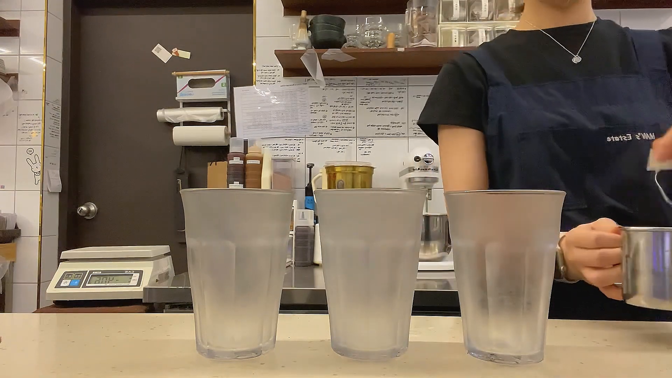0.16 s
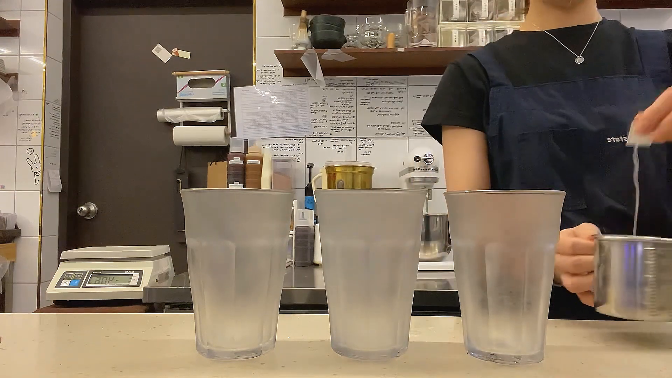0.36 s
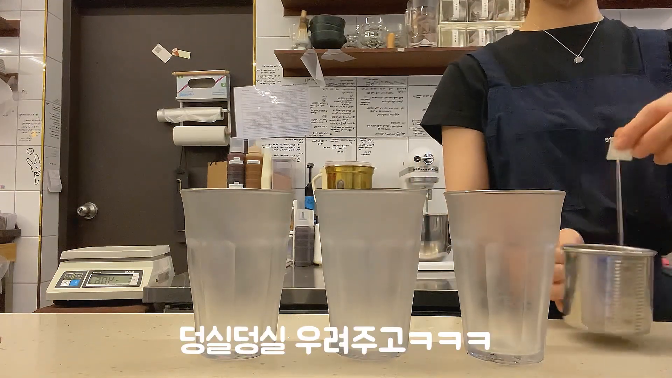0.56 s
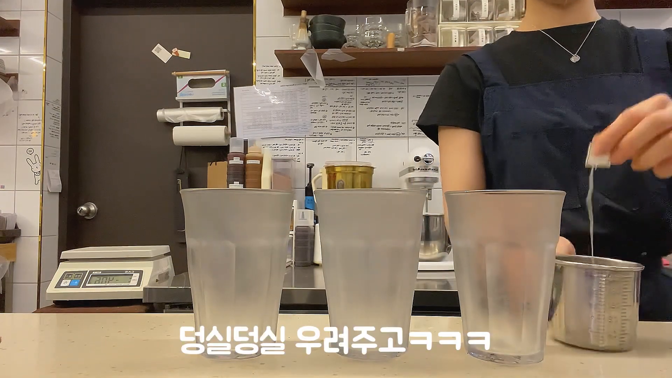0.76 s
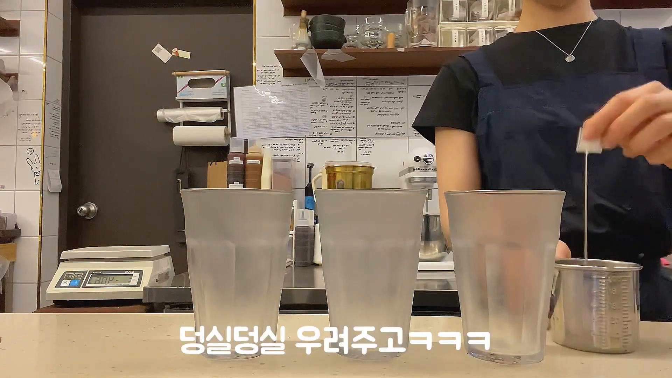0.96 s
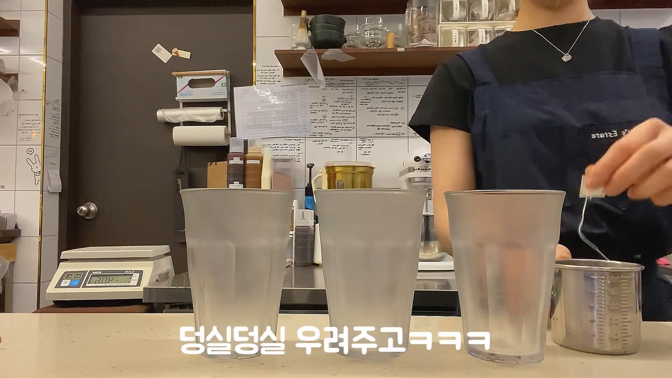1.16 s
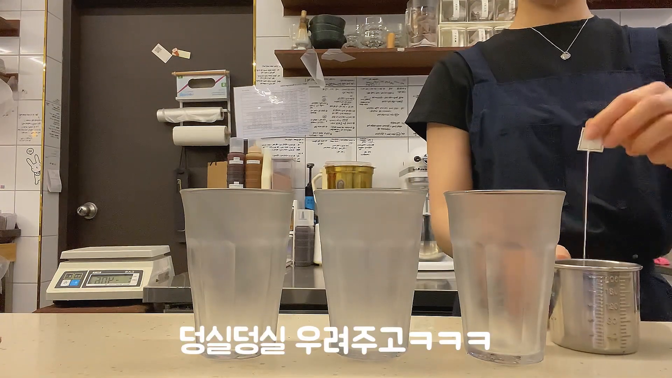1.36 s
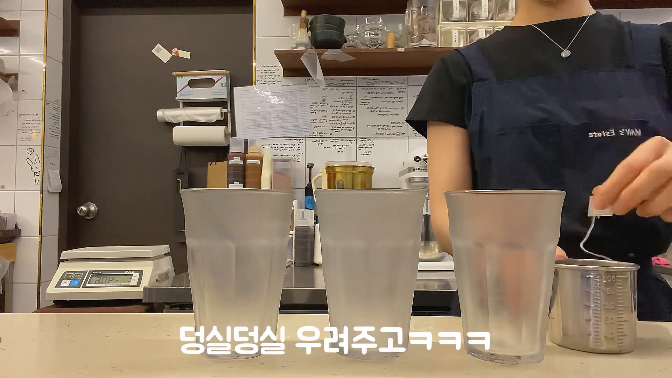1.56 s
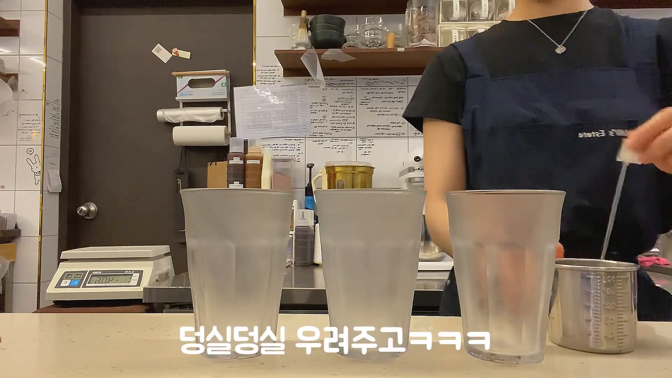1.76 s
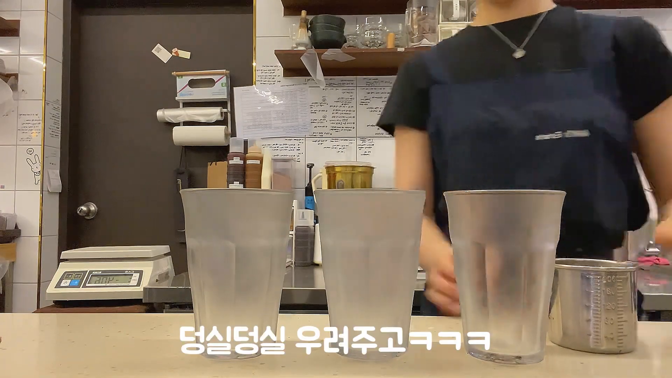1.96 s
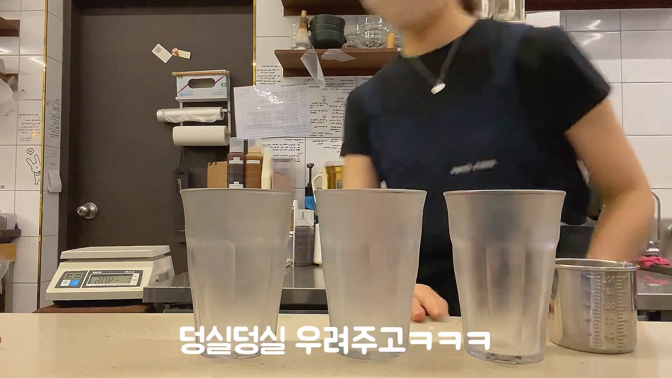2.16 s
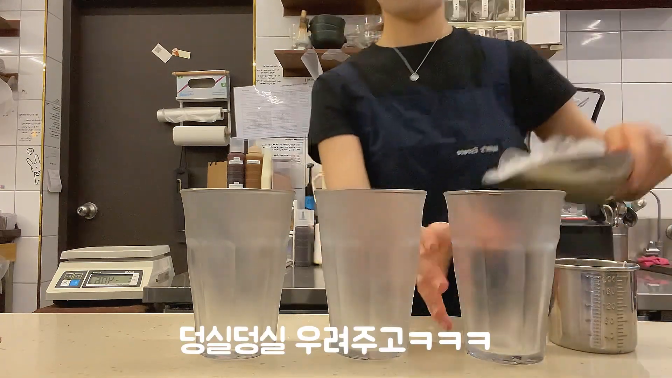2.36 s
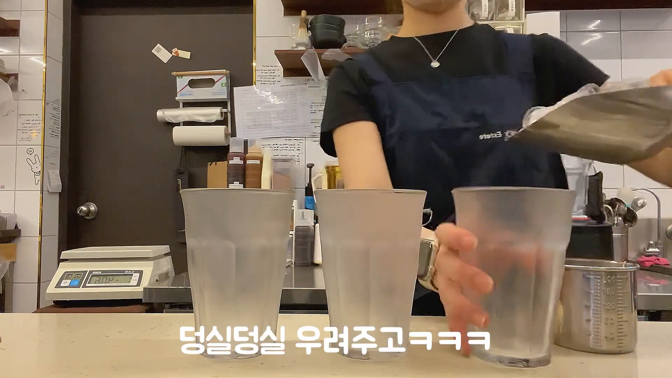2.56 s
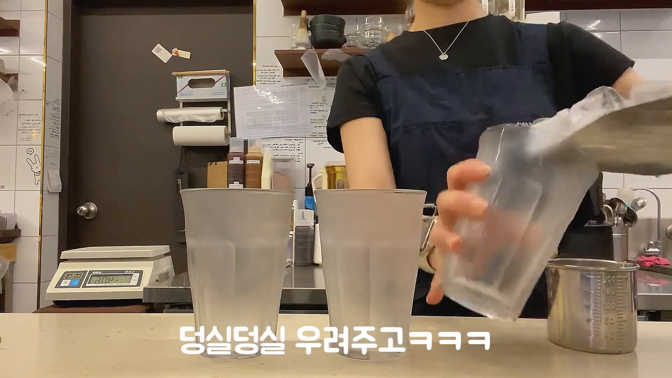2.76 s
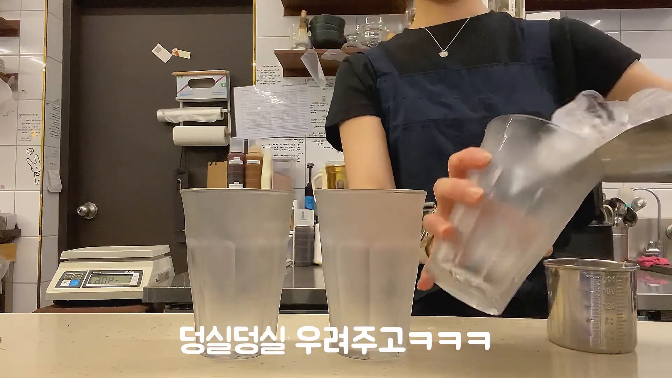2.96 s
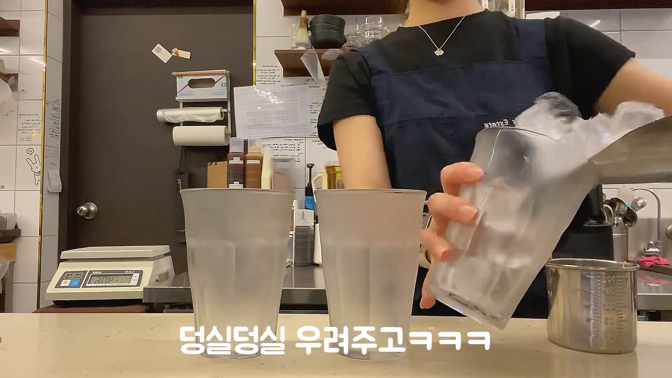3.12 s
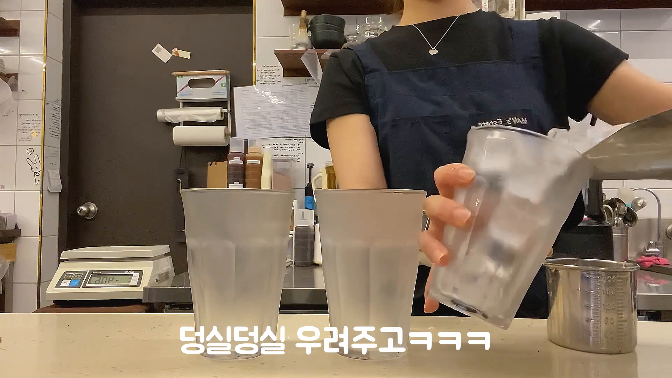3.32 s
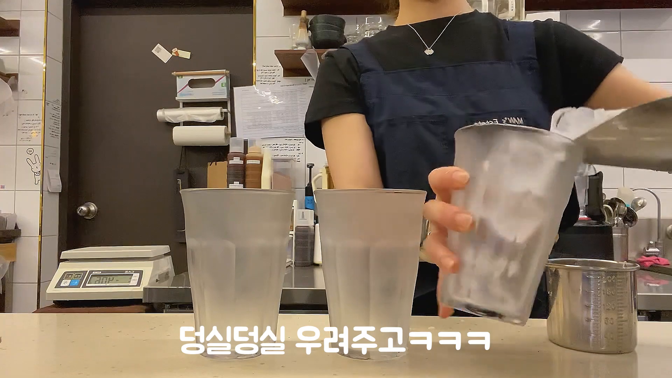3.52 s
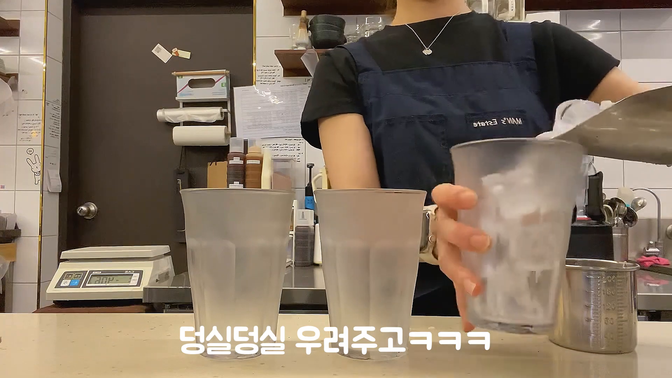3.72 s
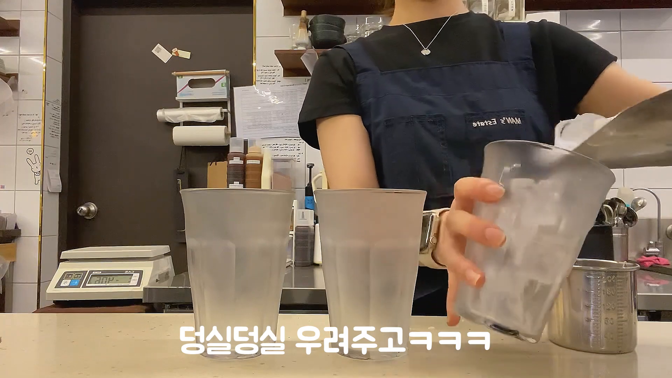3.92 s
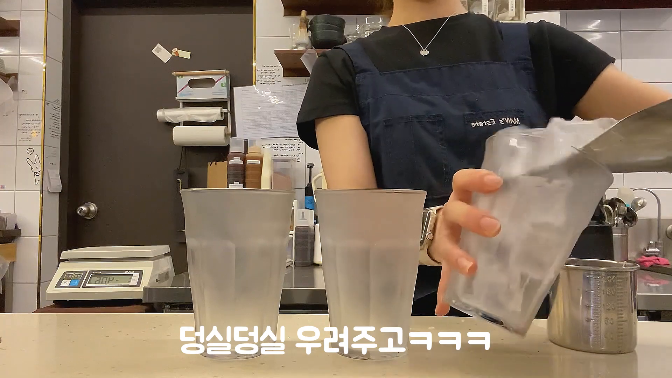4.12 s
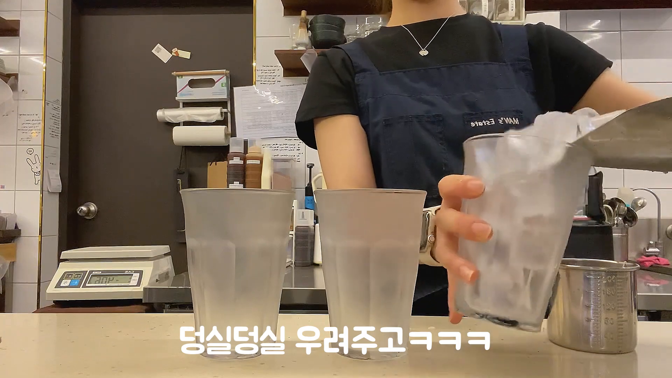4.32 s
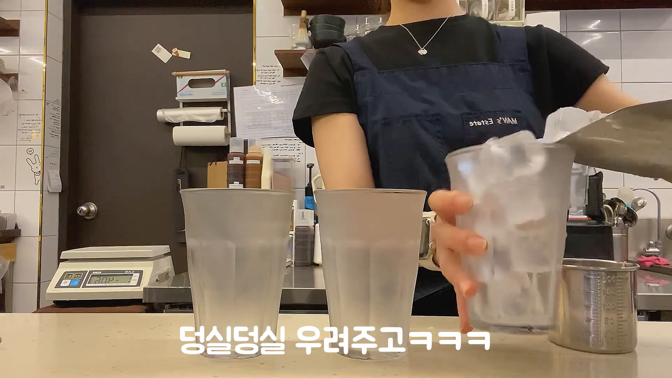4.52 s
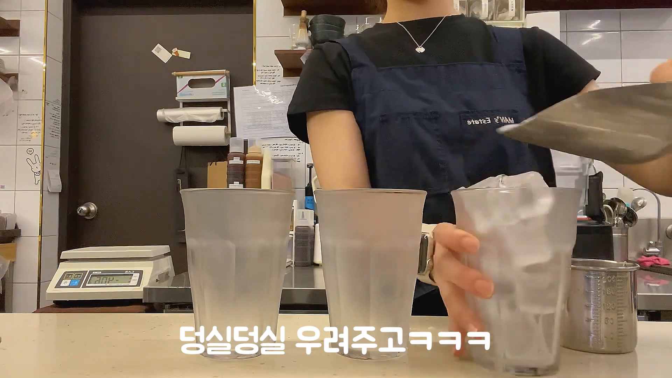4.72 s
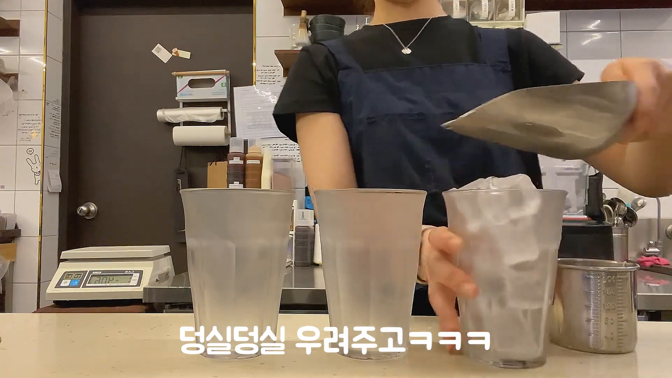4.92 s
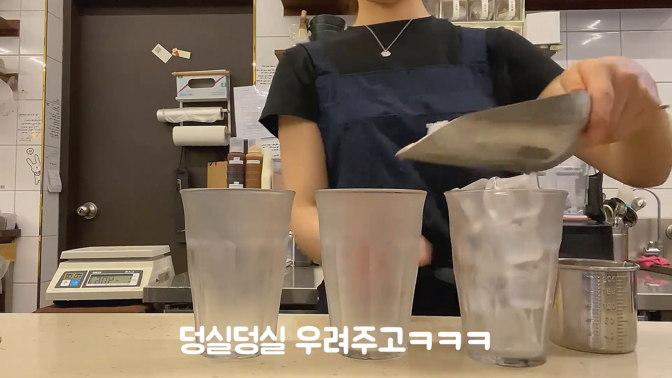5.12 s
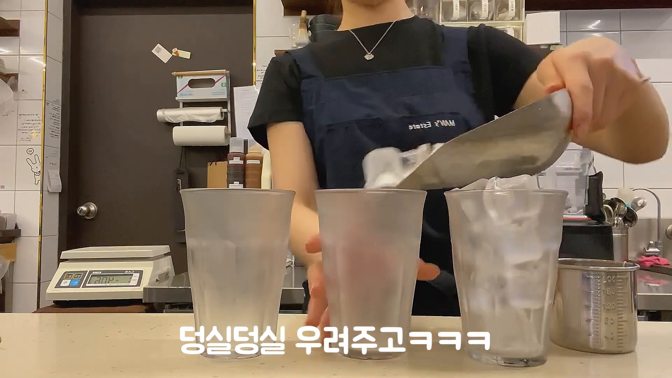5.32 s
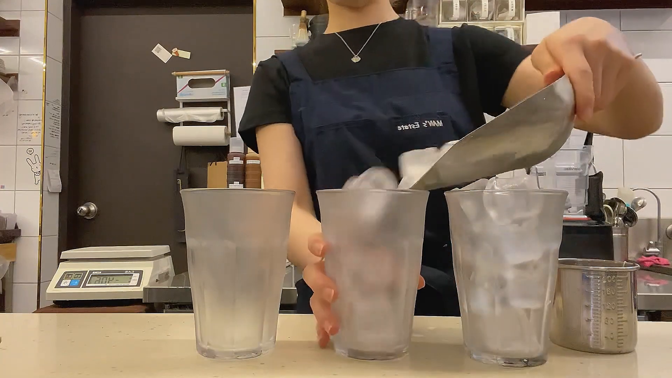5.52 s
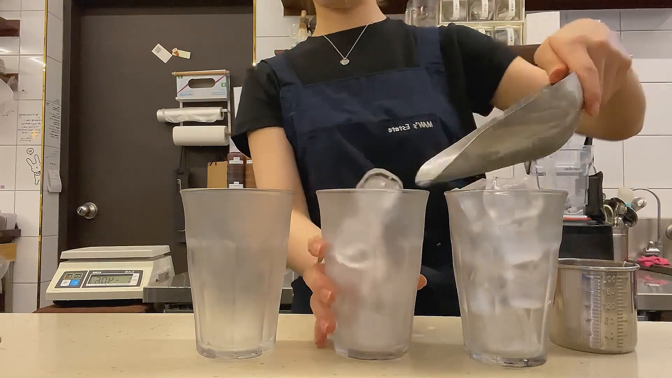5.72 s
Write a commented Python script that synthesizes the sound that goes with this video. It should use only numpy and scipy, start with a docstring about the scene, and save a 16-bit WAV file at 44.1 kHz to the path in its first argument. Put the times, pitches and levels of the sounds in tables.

```python
"""Ice cubes in drinking glasses

Ice is handled, scooped and tipped into thick glasses on the counter of a small cafe kitchen. Impacts
excite the modes of the glass wall (clinks), of the air inside it (a hollow note) and of the counter
(thumps); irregular solids knock and rustle in bands of decaying noise. A machine rumbles behind,
and the close microphone saturates softly on the loudest clinks."""
import sys
import numpy as np
from scipy import signal
from scipy.fft import rfft, irfft
from scipy.io import wavfile
from scipy.ndimage import uniform_filter1d

SR = 44100
rng = np.random.default_rng(int(sys.argv[2]) if len(sys.argv) > 2 else 0)


def put_to_file(sound):
    """Save the sound as 16-bit audio at rate SR, in the file named by the first command-line argument."""
    columns = np.atleast_2d(sound).T  # one column per channel
    safe = np.clip(columns, -1, 1)
    whole_steps = np.round(safe * 32767)
    wavfile.write(sys.argv[1], SR, whole_steps.astype(np.int16))


N = 254898

# Wall modes in close pairs: f/Hz, partner offset/Hz, share of the decay time, roughness from rubbing/dB
WALL_MODES = [(2643, 24, 1, 1.8), (6842, -45, .8, 4), (10150, 40, .6, 3), (11585, 45, .5, 3)]
# Cubes striking the wall: t/s, level/dB of each of the four modes, decay time T60/s
WALL_STRIKES = [(2.927, 1, -12, -43, -43, 0.22), (2.949, -7.5, -16.5, -40, -38, 0.15),
                (3.0311, -2.5, -18, -32, -45, 0.13), (3.077, -5.5, -16, -27, -41, 0.17),
                (3.1204, -0.5, -7.5, -33, -22, 0.084), (3.178, 2.5, -17, -29, -27, 0.059),
                (3.189, -28, 1, -11, -10.5, 0.031), (3.209, -8.5, -14, -53, -25, 0.05),
                (3.478, -0.5, -10.5, -25, -21, 0.048), (3.4981, 7, -2.5, -20, -12, 0.068),
                (3.5642, -4, -17, -44, -40, 0.055), (3.6052, -15, -27, -39, -39, 0.081),
                (4.1077, -6, -12.5, -41, -28, 0.03), (4.189, -13.5, -20, -40, -36, 0.04),
                (4.286, -4, -11, -18, -13, 0.041), (5.376, 7, -8, -36, -36, 0.18),
                (5.451, 2.5, -16.5, -26, -16, 0.34), (5.503, -4.5, -21, -11.5, -35, 0.12),
                (5.5257, -10, -21.5, -39, -26.5, 0.19), (5.5582, -7.5, -25, -21, -36, 0.23),
                (5.6201, -7, -11, -40, -31, 0.12), (5.637, -12.5, -15, -24.5, -36, 0.19),
                (5.756, -5, -16, -49, -35, 0.19)]
def clinks():
    """Free vibration: the wall rings in beating pairs of modes until the next strike stops it."""
    t, out = np.arange(SR // 2) / SR, np.zeros(N)
    gaps = np.append(np.diff([row[0] for row in WALL_STRIKES]), 1)
    for (start, *levels, t60), gap in zip(WALL_STRIKES, gaps):
        detune, phase = rng.random(2)
        ring = 0
        for (hz, offset_hz, share, rough_db), db in zip(WALL_MODES, levels):
            hz *= 1 + 0.018 * (detune - .5)  # grip and load shift the modes a little
            fall_db = 60 * t / (share * t60)
            mode = gain_of(-fall_db) * np.sin(2 * np.pi * hz * t)
            partner = gain_of(-20 - .28 * fall_db) * np.sin(2 * np.pi * ((hz + offset_hz) * t + phase))
            rubbing_db = rough_db * wander(rng.standard_normal(len(t)), 200)
            ring += gain_of(db + rubbing_db) * (mode + partner)
        damping = np.exp(-np.maximum(t - gap, 0) / 0.0006)
        add(out, start, ring * rise(t, 0.0004) * damping)
    return out


def settling():
    """Random excitation: after each clink the jostling cubes brush the wall's two lowest modes."""
    t, jostle = np.arange(SR) / SR, np.zeros(N)
    for start, db, *_ in WALL_STRIKES:
        add(jostle, start, gain_of(db - 60 * t / 0.54))
    touches = jostle * impulses(per_second=250, spread_db=4, cap_db=12)
    t = t[:3000]
    tap = sum(gain_of(db - 60 * t / 0.055) * np.sin(2 * np.pi * hz * t)
              for (hz, *_), db in zip(WALL_MODES, (-42, -50)))
    return signal.oaconvolve(touches, tap * rise(t, 0.0016))[:N]


# Air resonance of the vessel, shifting as ice fills it and the hand tilts it: t/s, f/Hz
AIR_RESONANCE = [(0, 790), (2.4, 722), (2.83, 665), (3.0, 746), (3.2, 692), (4.3, 633), (4.85, 754),
                 (5.3, 610), (5.5, 827)]
def contact(start, body_db, body_hz, air_db, clack_db, clack_hz, tick_db, t60, hard=0):
    """Impulse response: body, enclosed air, clack and tick each decay in a share of the nominal T60."""
    t, t60 = np.arange(12288) / SR, np.clip(t60, .015, .5)
    noise = rng.standard_normal((5, len(t)))
    chatter = gain_of(1.97 * wander(noise[4], 130))  # bouncing
    attack = rise(t, 0.00025 + 0.034 * t60 ** 2)  # long rubbing contacts start softly
    spike = 0.9 * np.exp(-t / 0.00084)

    def fade(share):
        return (gain_of(-60 * t / (share * t60)) + spike) * attack

    air_hz = np.interp(start, *np.transpose(AIR_RESONANCE))
    body = gain_of(body_db - 8) * band(noise[0], body_hz, .8 - .16 * hard, peak_db=-4) * fade(.64)
    air = gain_of(air_db) * band(noise[1], air_hz, .4 - .2 * hard, peak_db=10 * hard) * fade(.9)
    clack = gain_of(clack_db) * band(noise[2], clack_hz, .92, peak_db=-5.5) * fade(.61)
    tick = gain_of(tick_db) * band(noise[3], 10500 / (1 + t60), 1) * fade(.54)
    glass_hz = clack_hz * (1 + .04 * noise[4, 0])
    glass_note = hard * gain_of(clack_db + 1) * np.sin(2 * np.pi * glass_hz * t) * np.exp(-t / 0.004)
    body_note = gain_of(body_db - 10.5 + 4.8 * hard) * np.sin(2 * np.pi * body_hz * t)
    return (body + clack + tick) * chatter + air + glass_note + body_note * np.exp(-t / 0.0048)


# Ice knocking in scoop and glass, nominal values:
# t/s, clack level/dB, body level/dB, body f/Hz, air level/dB, tick level re clack/dB, T60/s
CUBE_KNOCKS = [(0.028, -36.5, -46, 1460, -56, 0.5, 0.054), (1.978, -48, -43, 2500, -60, 14.5, 0.016),
               (2.8291, -13, -4.5, 1710, -16.5, -1.5, 0.13), (2.85, -16, -11, 1970, -45, -7, 0.059),
               (2.9273, -18.5, -16, 2600, -35, 3, 0.077), (2.9513, -26, -0.5, 2970, -8, 8.5, 0.068),
               (2.9929, -39, -13.5, 3020, -12.5, -29, 0.14), (3.0225, -38, -18, 2880, -29, -20.5, 0.075),
               (3.033, -40, -11, 3280, -39, -10, 0.022), (3.0753, -26, 0.5, 3100, -20.5, -9, 0.12),
               (3.1188, -3, -5.5, 1460, -20.5, -5, 0.13), (3.1769, -17.5, -29, 2370, -24, -30, 0.22),
               (3.1893, -16.5, -5, 1960, -19, -4, 0.16), (3.3453, -33.5, -20, 2550, -39, -7, 0.075),
               (3.46, -19, -21, 1820, -30.5, -29, 0.16), (3.476, -15.5, -15.5, 2200, -42, -12, 0.18),
               (3.4976, -25, -15, 2300, -24.5, -17, 0.47), (3.565, -36, -10, 2680, -47, -23, 0.18),
               (3.6068, -38, -25, 2200, -33, 1, 0.38), (4.1075, -24, -8, 2096, -31.5, 7.5, .13),
               (4.1494, -34, -25, 1900, -20, -1, 0.22), (4.1684, -13, -3.5, 2120, -19, -15, 0.054),
               (4.2847, -15.5, -17, 2030, -40, -15, 0.079), (4.2994, -24, -12, 2320, -22, -16, 0.085),
               (4.318, -7.5, -3, 2040, -17.5, -9, 0.13), (4.34, -19, -37, 1970, -46, -3.5, 0.2),
               (4.608, -32, -39, 1800, -59, -4, 0.037), (4.635, -32, -31, 1570, -55, -17, 0.097),
               (4.7687, -26.5, -9.5, 2670, -41, -11, 0.069), (4.81, -46, -18, 3230, -50, -10, 0.061),
               (4.915, -35.5, -27.5, 2190, -53, -16, 0.13), (5.1158, -40, -19.5, 2310, -55, -12, .13),
               (5.311, -16.5, -3, 1660, -18, -2.5, .14), (5.374, -19.5, -7, 1410, -35, -7, 0.075),
               (5.447, -18, -6.5, 1200, -20.5, 6.5, 0.085), (5.4666, -13, -6.5, 1840, -14.5, -21.5, 0.15),
               (5.5026, -10.5, -5.5, 1545, -9, -12.5, 0.15), (5.5616, -14.5, -12, 1150, -26, -38, 0.35),
               (5.6231, -21, -16, 2500, -36, -31, 0.22), (5.6388, -10, -7, 2250, -35, -45, 0.053),
               (5.757, -25, -8.5, 2380, -26.5, -27, 0.028)]
def cube_knocks():
    """Hard impact: a cube excites body and air resonances and a short note of the glass near 3.7 kHz."""
    out = np.zeros(N)
    for start, clack_db, body_db, hz, air_db, tick_db, t60 in CUBE_KNOCKS:
        add(out, start, contact(start, body_db, hz, air_db, clack_db,
                                clack_hz=3720, tick_db=clack_db + tick_db, t60=t60, hard=1))
    return out


# Cup and glasses on the counter, nominal values:
# t/s, body level/dB, body f/Hz, air level/dB, clack level/dB, T60/s
VESSEL_BUMPS = [(0.125, -27, 905, -40, -62, 0.67), (1.21, -21, 546, -55, -43, 0.28),
                (4.875, -18.5, 1000, -39, -56, 0.28), (0.693, -1, 1366, -20, -12, 0.13),
                (0.8872, -4.5, 1550, -57, -20, 0.056), (0.97, -25, 900, -41, -62, 0.49),
                (2.3896, -7, 1095, -21.5, -28.5, 0.26), (2.448, -17, 930, -37, -32.5, 0.19),
                (2.5334, -14, 1500, -25, -31, 0.23), (2.634, -22, 1400, -60, -39, 0.27),
                (3.8986, -16.5, 874, -49, -42, 0.4), (4.228, -19, 1140, -47, -57, 0.26),
                (4.3511, -12.5, 1020, -15.5, -33, 0.2), (4.6749, 7.5, 1227, 4, -10.5, 0.066),
                (4.8284, -9, 1010, -12.5, -45, 0.072), (4.841, -1.5, 1130, -6.5, -28.5, 0.035)]
def vessel_bumps():
    """Softer impact: a vessel bumping or dragging on the counter excites broad, damped resonances."""
    out = np.zeros(N)
    for start, body_db, hz, air_db, clack_db, t60 in VESSEL_BUMPS:
        add(out, start, contact(start, body_db, hz, air_db, clack_db,
                                clack_hz=2770, tick_db=clack_db - 12, t60=t60))
    return out


# Blows on the counter board: t/s, level/dB, f/Hz
COUNTER_THUMPS = [(0.306, -17.5, 328), (0.556, -23, 324), (0.625, -24.5, 320), (0.661, -21, 326),
                  (0.86, -27, 317), (1.389, -24.5, 385), (2.245, -15, 327), (3.565, -25, 237),
                  (3.943, -22.5, 314), (4.674, -15.5, 268.6), (4.677, -13, 108), (4.953, -19.5, 328.5),
                  (5.193, -17, 331.4), (5.313, -18.5, 116.5), (5.634, -22, 173)]
def counter_thumps():
    """Damped oscillation: two modes of the heavy board build up over a cycle or two and soon die."""
    t, out = np.arange(SR // 3) / SR, np.zeros(N)
    for start, db, hz in COUNTER_THUMPS:
        pair = np.sin(2 * np.pi * hz * t) + 0.3 * np.sin(2 * np.pi * (1.12 * hz * t + rng.random()))
        add(out, start, gain_of(db - 60 * t / 0.23) * rise(t, 0.44 / hz) * pair)
    return out


# Paper, cloth and wet ice against the hand, nominal values: t/s, hiss level/dB, hiss f/Hz, body level/dB
HAND_RUSTLES = [(0.3063, -25.5, 4630, -18), (0.5042, -33.5, 4500, -22.5), (0.5538, -36, 5700, -38),
                (0.624, -32.5, 5900, -39), (1.1716, -28.5, 4470, -19.5), (1.3882, -32.5, 4170, -27.5),
                (1.416, -32, 5930, -36), (2.2414, -33, 4430, -30.5), (3.8326, -40.5, 4630, -37),
                (3.942, -36, 5900, -53), (4.0823, -30.5, 3050, -28), (4.5041, -33.5, 4450, -43),
                (4.9537, -29.5, 4100, -25.5), (5.1894, -32, 3700, -32.5), (5.2434, -26.5, 4030, -30)]
def rustles():
    """Friction noise: each rub is a soft burst of hiss, with more treble the higher its band lies."""
    out = np.zeros(N)
    for start, hiss_db, hiss_hz, body_db in HAND_RUSTLES:
        tick_db = hiss_db + 10.5 * np.log2(hiss_hz / 4420)
        add(out, start, contact(start, body_db, body_hz=1310, air_db=body_db - 31,
                                clack_db=hiss_db, clack_hz=hiss_hz, tick_db=tick_db, t60=0.34))
    return out


# Spectrum of loose ice: f/Hz, level/dB
RATTLE_SPECTRUM = [(200, -68), (600, 3.5), (1500, -2.5), (4000, -6.5), (9500, -14.5), (16000, -29)]
def loose_ice():
    """Shot noise: small shifting pieces of ice give dense, brief ticks over a steady scrape."""
    ticks = impulses(per_second=1100, spread_db=5, cap_db=25) * rng.choice([-1, 1], N)
    grain = rng.standard_normal(600) * gain_of(-60 * np.arange(600) / SR / 0.014)
    scrape = 4 * rng.standard_normal(N)
    return coloured(signal.oaconvolve(ticks, grain)[:N] + scrape, RATTLE_SPECTRUM)


# Spectrum of machine and room: f/Hz, level/dB
AMBIENT_SPECTRUM = [(25, -42), (57, 3.5), (76, -18.5), (98, 2.5), (125, -7), (240, -4.5), (330, -9.5),
                    (480, -15), (1000, -20), (2500, -41), (9000, -41.5), (12500, -54), (16000, -68)]
# Background envelopes: t/s, rumble level/dB, nominal level of loose ice/dB
BACKGROUND_LEVELS = [(0, -42.5, -50), (.16, -33.5, -44.5), (.3, -41, -46), (.9, -37, -43),
                     (1.2, -38.5, -43.5), (2.21, -41, -48.5), (2.259, -24, -36), (2.75, -34.5, -36.5),
                     (3.25, -38, -33.5), (3.42, -36, -42.5), (3.6, -28, -29.5), (3.72, -35, -44),
                     (4.36, -30, -37.5), (4.6, -34.5, -37), (4.85, -24.5, -37), (5.1, -34, -38),
                     (5.6, -24.5, -25), (5.78, -32.5, -41)]
def background():
    """Amplitude-modulated noise: over steady room hiss, machine rumble and ice rattle swell and fade; the
    background level jumps abruptly near 2.2 s."""
    times, rumble_db, ice_db = np.transpose(BACKGROUND_LEVELS)
    t = np.arange(N) / SR
    ambient = coloured(rng.standard_normal(N), AMBIENT_SPECTRUM)
    rumble = signal.sosfilt(signal.butter(2, 450, fs=SR, output="sos"), ambient)
    hiss = gain_of(-40) * (ambient - rumble)
    rattle = gain_of(np.interp(t, times, ice_db) - 5) * loose_ice()
    return gain_of(np.interp(t, times, rumble_db)) * rumble + hiss + rattle


# Reverberation time of the kitchen: f/Hz, T60/s
REVERB_TIMES = [(200, 0.23), (4000, 0.21), (10000, 0.17)]
def room(x):
    """Reverberation: sparse reflections of random sign die away, the treble soonest."""
    taps = np.zeros(SR // 2)
    slots = np.arange(200, len(taps) - 20, 20)
    taps[slots + rng.integers(0, 20, len(slots))] = rng.choice([-1., 1.], len(slots))
    hz, t, bands = signal.stft(taps, SR, nperseg=256)
    decay = gain_of(-60 * t / at_frequency(REVERB_TIMES, hz)[:, None])
    tail = signal.istft(bands * decay, SR, nperseg=256)[1]
    return signal.fftconvolve(x, tail / np.linalg.norm(tail))[:N]


def band(noise, hz, octaves, peak_db=0):
    """Modal overlap: crowded modes merge into an uneven bell-shaped band, with one peak standing out."""
    distance = np.log2(np.fft.rfftfreq(len(noise), 1 / SR) / hz + 1e-9)
    peak = gain_of(peak_db) * np.exp(-(distance / .13) ** 2)
    bell = np.exp(-(distance / octaves) ** 2) + 0.00092
    ripple = gain_of(5 * wander(noise, 70)[:len(bell)])
    return unit_rms(irfft(rfft(noise) * (bell + peak) * ripple, len(noise)))


def impulses(per_second, spread_db, cap_db):
    """Poisson process: independent touches, most weak and a few strong."""
    level_db = np.minimum(spread_db * rng.exponential(1, N), cap_db)
    return gain_of(level_db) * (rng.random(N) < per_second / SR)


def coloured(x, spectrum):
    """Spectral shaping by (f/Hz, level/dB) points, scaled to unit rms."""
    hz = np.fft.rfftfreq(len(x), 1 / SR)
    return unit_rms(irfft(rfft(x) * gain_of(at_frequency(spectrum, hz)), len(x)))


def at_frequency(points, hz):
    f, value = np.transpose(points)
    return np.interp(np.log(hz + 1), np.log(f + 1), value)


def wander(noise, samples):
    return unit_rms(uniform_filter1d(noise, samples))


def rise(t, tau):
    return -np.expm1(-t / tau)


def gain_of(db):
    return 10 ** (np.asarray(db) / 20)


def unit_rms(x):
    return x / np.sqrt(np.mean(x ** 2) + 1e-20)


def add(mix, start, sound):
    part = mix[round(start * SR):][:len(sound)]
    part += sound[:len(part)]


def scene():
    """Superposition: direct sound, its reverberation and the background add in one channel."""
    hits = rustles() + vessel_bumps() + cube_knocks() + counter_thumps()
    rings = clinks() + settling()
    reverb = room(gain_of(-10.5) * hits + gain_of(-17) * rings)
    return (hits + rings + reverb + background())[None]


def record(dry):
    """Soft saturation rounds the peaks near full scale; a low-pass filter then limits the band."""
    ceiling, knee, cutoff_hz = 0.93, 8, 16150
    soft = dry / (1 + abs(dry / ceiling) ** knee) ** (1 / knee)
    lowpass = signal.firwin(511, cutoff_hz, window=("kaiser", 9), fs=SR)
    return signal.oaconvolve(soft, lowpass[None], "same")


dry = scene()
out = record(dry)
put_to_file(out)
```